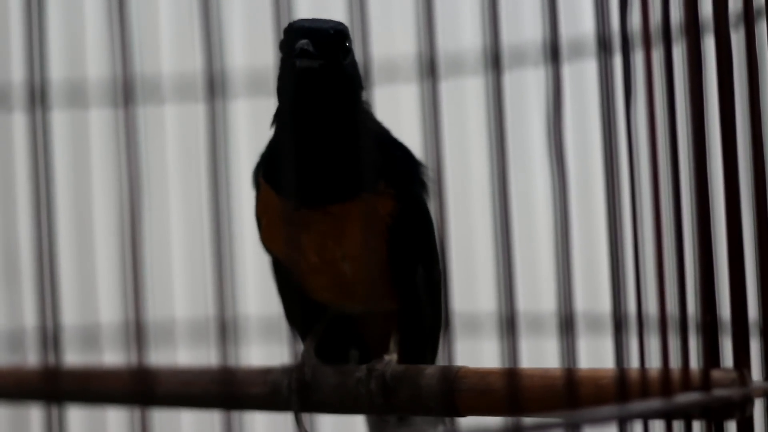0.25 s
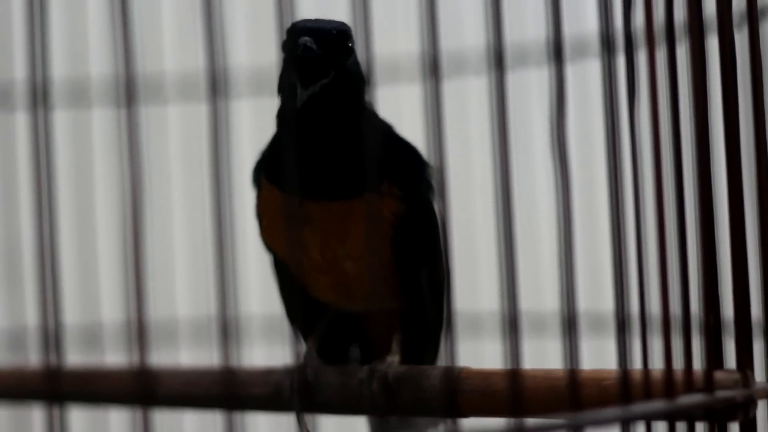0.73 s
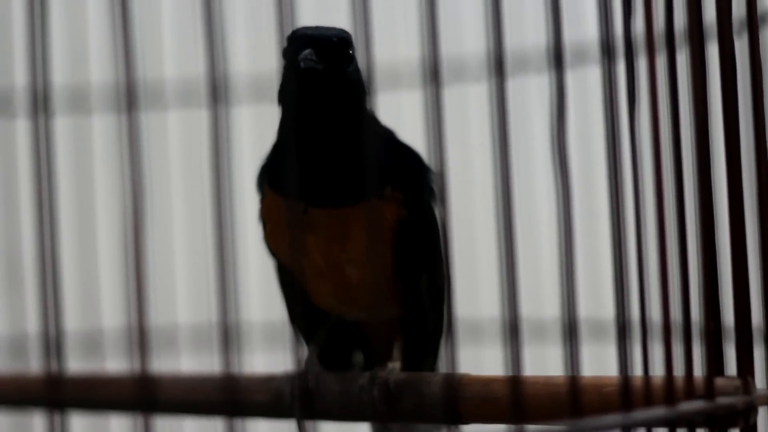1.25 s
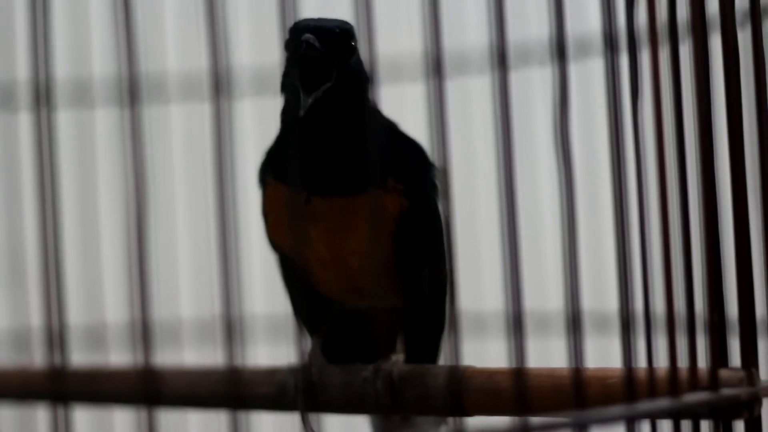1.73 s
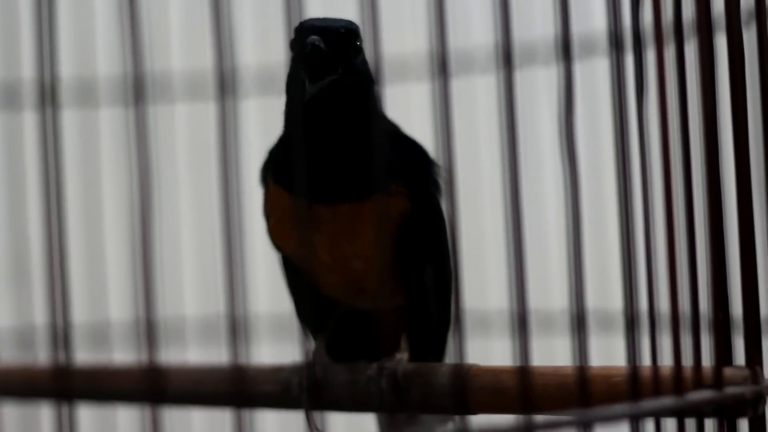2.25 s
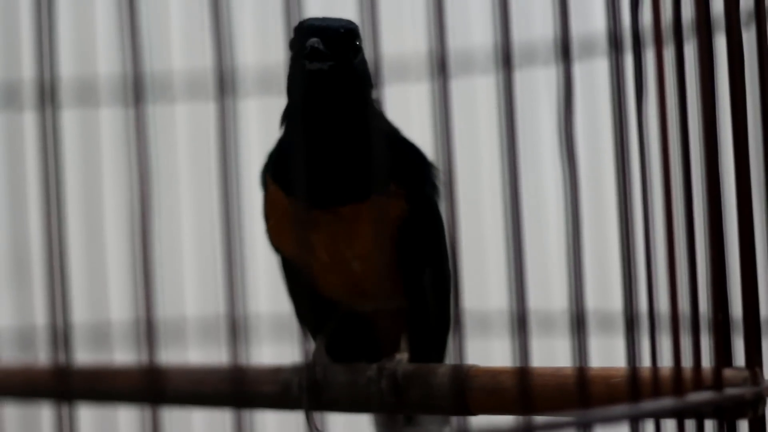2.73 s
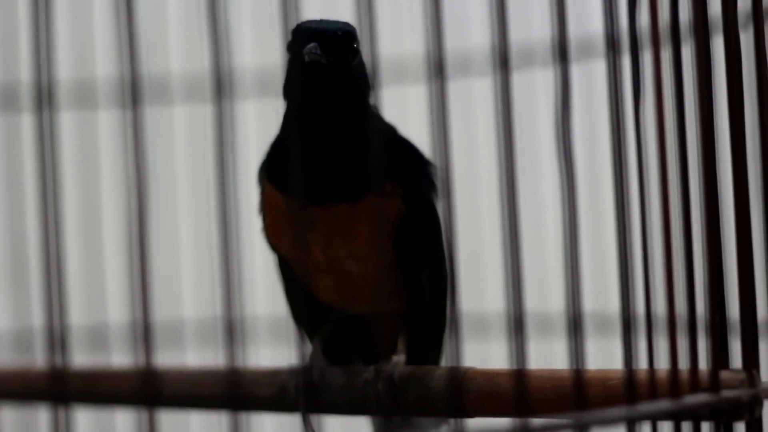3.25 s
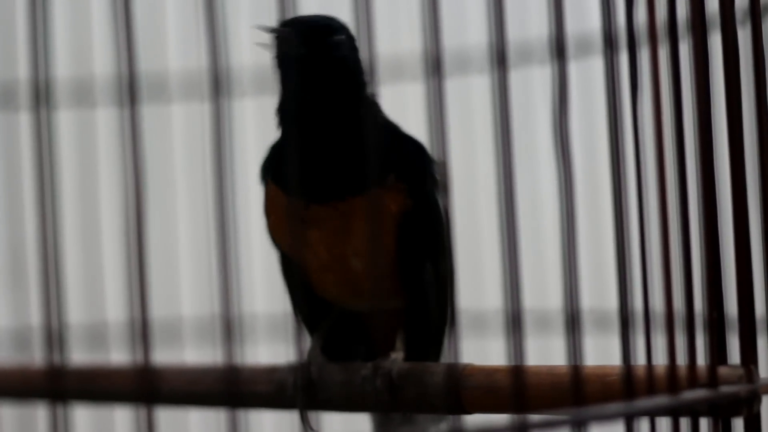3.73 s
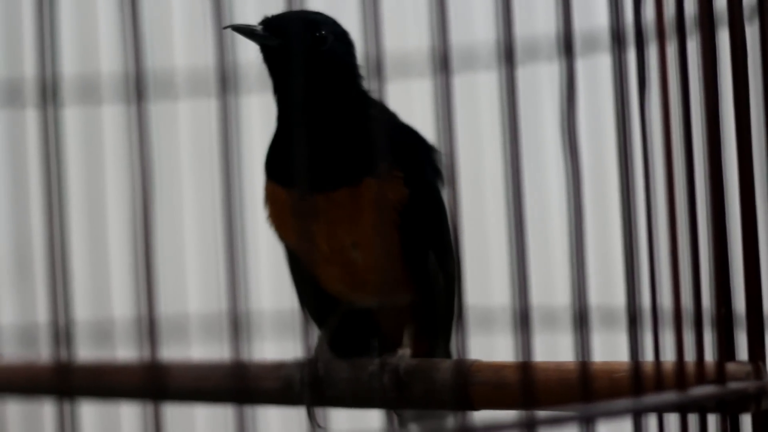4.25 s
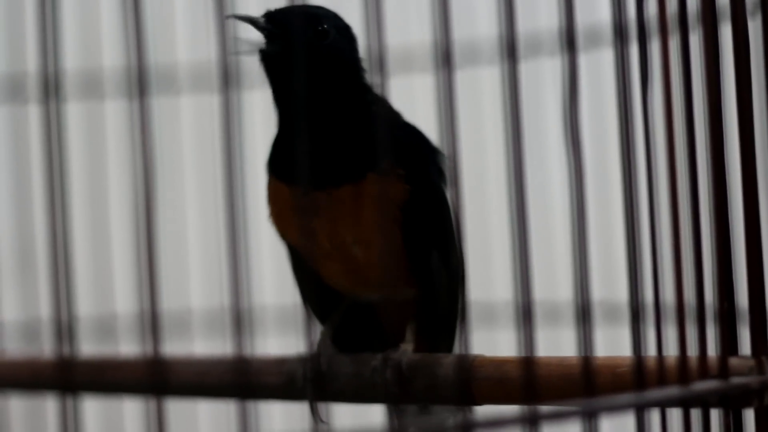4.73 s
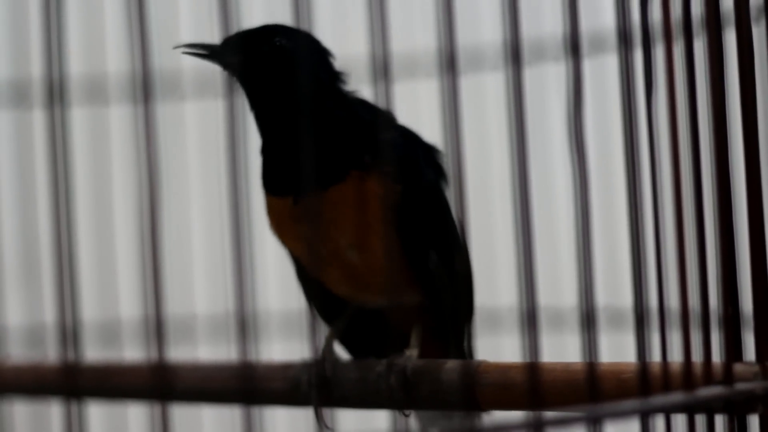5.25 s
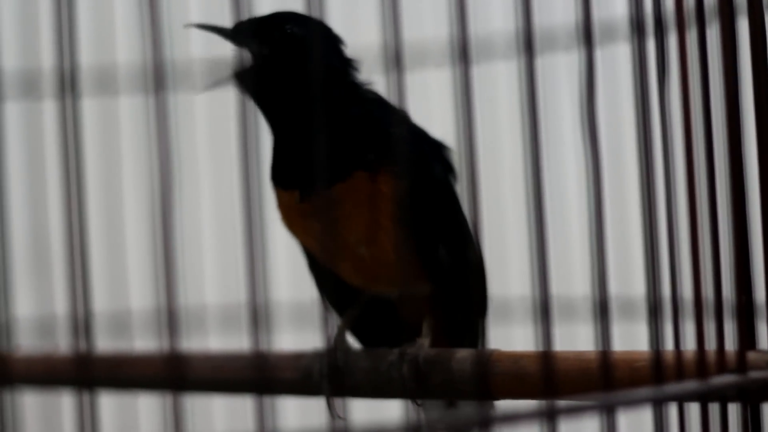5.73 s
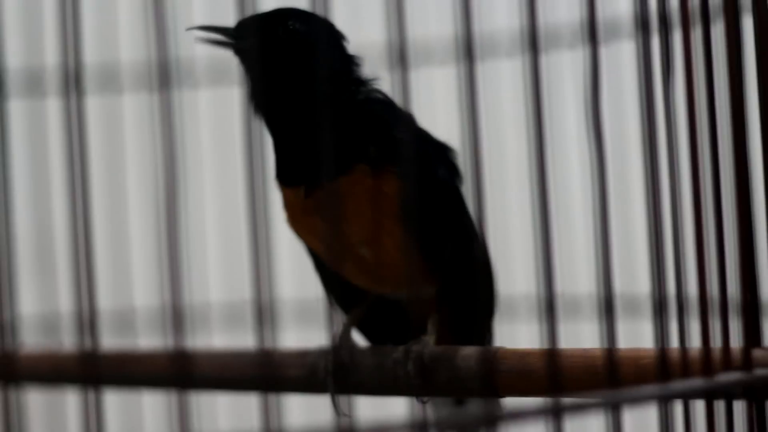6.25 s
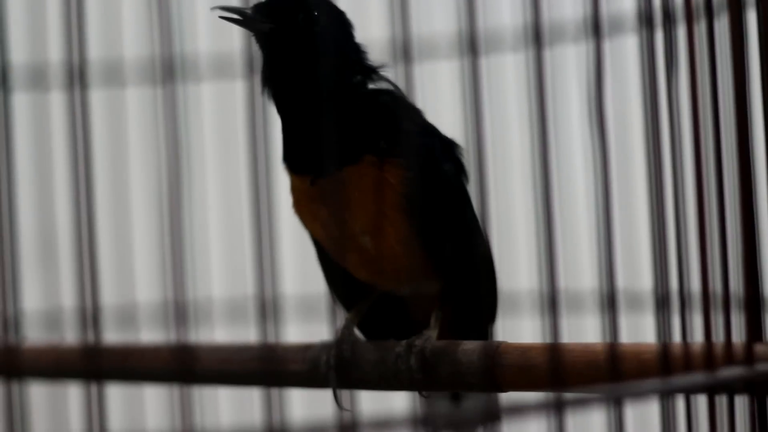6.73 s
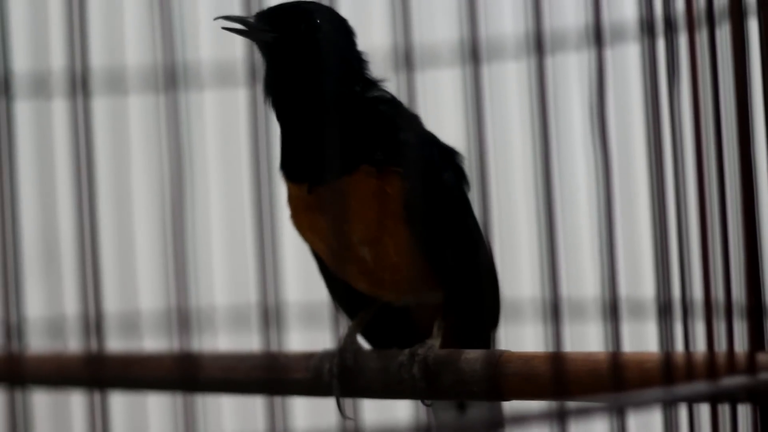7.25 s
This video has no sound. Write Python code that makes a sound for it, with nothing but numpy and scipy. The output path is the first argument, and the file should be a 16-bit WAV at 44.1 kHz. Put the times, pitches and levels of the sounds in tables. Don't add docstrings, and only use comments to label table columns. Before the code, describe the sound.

The yard is already ringing as a nearby caged songbird starts with a short arching warble, then a settling trembling whistle around 0.2 s. Four hoarse, fluttering, rising buzzes follow from 0.8 to 1.1 s. After a pause, a bright whistle sweeps upward at 1.7, a dip flicks up at 2.0, a sharp hook drops at 2.2, and mellow rises and a scoop run from 2.4 to 3.1. Quick stutters, kicks and a trill come at 3.6-3.9. Distant raspy chirps cluster near 4.3-4.6. A pip, chip and warbled hold follow at 4.7-5.0, a piercing climb at 5.4, another dip at 5.6, descending steps at 5.9, and quick falls at 6.2-6.5. Low droops, lifts and long warbles lead to a late fall and final rising note at 7.4. Echoes linger over faint rumble; background swells in pauses.

```python
import sys
import numpy as np
from scipy import signal
from scipy.fft import rfft, irfft
from scipy.io import wavfile
from scipy.ndimage import uniform_filter1d, map_coordinates

SR = 44100
rng = np.random.default_rng(int(sys.argv[2]) if len(sys.argv) > 2 else 0)


def voltage_ratio(level):
    return 10 ** (np.asarray(level, float) / 20)


def wav_record(signal):
    frames = np.transpose(np.atleast_2d(signal))
    bounded = np.clip(frames, -1, 1)
    quanta = np.round(bounded * 32767).astype(np.int16)
    wavfile.write(sys.argv[1], SR, quanta)


N = 330750
LEAD = SR // 2
LONG = N + LEAD
CLOCK = (np.arange(LONG) - LEAD) / SR


def at_hz(points, hz):
    points_hz, points_db = np.transpose(points)
    return np.interp(np.log(hz), np.log(points_hz), points_db)


def band(x, low_hz, high_hz, order=2):
    sos = signal.butter(order, [low_hz, min(high_hz, .45 * SR)], "band", fs=SR, output="sos")
    return signal.sosfilt(sos, x)


def wobble(count, hz):
    low_pass = signal.butter(2, hz, fs=SR, output="sos")
    slow = signal.sosfilt(low_pass, rng.standard_normal(count + 2000))[2000:]
    return slow / slow.std()


def span(start_s, length_s):
    first = LEAD + round(start_s * SR)
    part = slice(first, min(first + round(length_s * SR), LONG))
    return part, CLOCK[part]


def edges(t, rise_s, fall_s):
    nearest_end = np.minimum((t - t[0]) / rise_s, (t[-1] - t) / fall_s)
    return np.sin(np.pi / 2 * np.clip(nearest_end, 0, 1)) ** 2


# (frequency_hz, level_db per Hz)
AMBIENCE = [(25, -19), (45, 0), (100, -7.5), (140, -1), (190, -10), (330, -8), (600, -5.5), (1200, -8),
            (2500, -9), (4500, -14.5), (8500, -18.5), (11300, -26.5), (15500, -50.5)]
# (time_s, level_db)
TRAFFIC = [
    (0, -1),
    (1.3, -9),
    (2.3, -6),
    (3.6, -0.5),
    (5.4, 0),
    (6.5, 1),
    (7.5, 0.5),
]


def ambience():
    hz = np.maximum(np.fft.rfftfreq(LONG, 1 / SR), 1)
    shape = voltage_ratio(at_hz(AMBIENCE, hz))
    noise = irfft(rfft(rng.standard_normal(LONG)) * shape, LONG)
    swell_db = np.interp(CLOCK, *np.transpose(TRAFFIC)) + 0.6 * wobble(LONG, 1.2)
    return noise * voltage_ratio(swell_db) / np.sqrt(np.mean(shape ** 2 * (hz < 700)))


# (time_s, pitch_hz, level_db)
ARCH = [(0, 1250, -22), (.03, 1345, -20.5), (.04, 1473, -17.5), (.085, 1508, -22), (.103, 1504, -15.5),
        (.138, 1320, -28), (.148, 1340, -35)]
SETTLE = [(0.21, 2197, -20.5), (0.222, 2205, -10.5), (0.234, 2086, -24), (0.24, 2050, -10.5),
          (0.272, 1984, -7.5), (0.302, 1952, -15.5), (0.326, 1911, -7.5), (0.356, 1924, -28)]
SWEEP = [(1.681, 3780, -33.5), (1.689, 3536, -18), (1.711, 3696, -8.5), (1.723, 3760, -15.5),
         (1.739, 4030, -5), (1.777, 4470, -14), (1.791, 4680, -3.5), (1.815, 4777, -11),
         (1.85, 4657, -14.5)]
HOOK = [(2.222, 3555, -23.5), (2.234, 3545, -15), (2.254, 3602, -9.5), (2.273, 3560, -15.5),
        (2.287, 2678, -23.5), (2.298, 2262, -20), (2.312, 2466, -14.5), (2.319, 2725, -5),
        (2.34, 2796, -19)]
SCOOP = [(2.71, 1866, -19), (2.74, 1985, -9.5), (2.791, 2102, -15.5), (2.841, 1970, -10),
         (2.881, 1600, -28.5), (2.927, 1416, -27), (2.991, 1872, -21), (3.03, 2032, -18), (3.07, 1959, -17)]
PIP = [(4.677, 2890, -34), (4.684, 1760, -24.5), (4.691, 1813, -13.5), (4.7, 1934, -7.5), (4.714, 1892, -6),
       (4.727, 2064, -14), (4.733, 2135, -15.5)]
CLIMB = [(5.38, 3910, -33), (5.388, 3588, -10), (5.426, 3850, -6), (5.452, 4327, -7), (5.466, 5250, -11),
         (5.478, 5550, -20), (5.486, 4890, -2.5), (5.504, 5095, -20), (5.543, 4760, -18.5)]
STEPS = [(5.919, 2404, -18.5), (5.958, 2433, -11), (6.0, 2397, -10.5), (6.03, 2227, -11.5),
         (6.049, 2035, -17), (6.107, 2075, -9), (6.124, 1885, -28.5), (6.149, 1288, -27.5)]
LIFT = [(6.67, 992, -43), (6.7, 1235, -19), (6.717, 1464, -16), (6.732, 1370, -13), (6.764, 1385, -14),
        (6.778, 1340, -19), (6.79, 1385, -10.5), (6.806, 1380, -11.5)]
CLOSE = [(7.407, 1335, -24.5), (7.419, 1700, -10), (7.44, 1988, -10), (7.459, 2068, -11)]
STUTTER = [(3.625, 1740, -29.5), (3.632, 1765, -17), (3.641, 1905, -9), (3.649, 1850, -19),
           (3.657, 1785, -9), (3.667, 1730, -17)]
# (octave_db over the windpipe rule, upper_partials_db)
FIGURE_OVERTONES = [(-4, -30.5), (-0.5, -35), (6, -25.5), (2, -31), (-3.5, -30.5), (-2.5, -30), (1, -35),
                    (-8, -30), (-2.5, -37.5), (-4, -27), (-5.5, -39.5)]
# (time_s, pitch_hz, level_db)
ANSWERS = [
    [(2.703, 3100, -46), (2.72, 3800, -37), (2.735, 3900, -34), (2.748, 3850, -39)],
    [(2.722, 5250, -48), (2.74, 5250, -45), (2.752, 4600, -43), (2.766, 4150, -46)],
]
# (time_s, pitch_hz, level_db)
RUN_UP = [(.777, 1900, -40), (.783, 2500, -33), (.788, 3350, -25)]


def long_figures():
    figures = (ARCH, SETTLE, SWEEP, HOOK, SCOOP, PIP, CLIMB, STEPS, LIFT, CLOSE, STUTTER)
    notes = [(figure, *overtones) for figure, overtones in zip(figures, FIGURE_OVERTONES)]
    return notes + [(thin, -20, -60) for thin in [*ANSWERS, RUN_UP]]


# (start_s, length_s, first_pitch_hz, second_pitch_hz, level_db)
FALL = [(0, 0.067, -12), (.25, .08, -2), (.65, .65, -5), (1, 0.98, -20)]
FALLS = [
    (6.24, 0.047, 1924, 1098, -15),
    (6.308, 0.037, 2266, 1199, -10.5),
    (6.368, 0.03, 2419, 1280, -6.5),
    (6.433, 0.021, 2574, 1395, -8.5),
    (7.239, 0.058, 1295, 799, -20),
]
DROOP = [(0, .06, -19), (.25, 0, -2), (.45, .22, 0), (.75, .75, -21.5), (1, 0.854, -16.5)]
DROOPS = [
    (6.614, 0.055, 1799, 1153, -10),
    (7.332, 0.057, 1594, 794, -7),
]
RISE = [(0, 0.017, -8), (.4, .5, -3), (.7, .92, 2.5), (.88, 0.94, 1.5), (1, 0.74, -3)]
RISES = [
    (2.432, 0.097, 1866, 2011, -12.5),
    (2.55, 0.047, 2180, 2355, -11),
    (6.56, 0.051, 889, 985, -33.5),
]
CHIP = [(0, 0.09, -20), (.45, 1, -0.5), (.75, .7, 3.5), (1, 0.14, -7.5)]
CHIPS = [
    (3.772, 0.007, 1830, 2280, -8.5),
    (4.833, 0.01, 2140, 2383, -8.5),
]
HOLD = [(0, 0.11, -5), (.15, .5, -5), (.5, 0.94, 1), (1, .9, -0.5)]
HOLDS = [
    (-.36, .12, 2870, 2640, -14.5),
    (-.2, 0.18, 2133, 1988, -18.5),
    (6.145, .035, 2070, 2085, -16.5),
    (4.851, 0.143, 1654, 1735, -17.5),
    (6.924, 0.21, 1557, 1582, -13),
]
DIP = [(0, .25, -22), (.22, .36, -8), (.36, .52, -7.5), (.65, .47, -11.5), (.85, .36, -6),
       (1, 0.076, -10.5)]
DIPS = [
    (1.957, .105, 2098, 3081, -5),
    (5.635, .127, 2122, 3116, -4.5),
]
KICK = [(0, 0, -12.5), (.4, .55, -11), (.65, 0.71, -3.5), (.82, 0.96, -0.5), (.93, .45, -1.5), (1, .4, 2)]
KICKS = [
    (3.733, .038, 1544, 1905, -10),
    (4.79, .04, 1650, 2040, -10),
]
TRILL = [(0, .3, -9), (.15, .6, -3), (.35, 1.1, 0), (.6, .9, -2), (.85, .3, -2.5), (1, .3, -8)]
TRILLS = [
    (3.813, .1, 1652, 1760, -9.5),
]
# (time_s after the dip, share of the way, level_db)
FLICK = [(0.012, 0.134, -13.5), (0.021, 0.617, 0), (0.028, 0.821, -6), (.038, .96, -6), (.048, .97, -9),
         (.051, 1.33, -9), (.057, 1.28, -13)]
# (octave_db over the windpipe rule, upper_partials_db)
OVERTONES = [
    (-3, -26.5),
    (-1, -36.5),
    (-3.5, -25),
    (-9, -49),
    (1.5, -32),
    (-3, -35),
    (4, -28),
    (1.5, -32),
]


def short_notes():
    kinds = [(FALL, FALLS), (DROOP, DROOPS), (RISE, RISES), (CHIP, CHIPS),
             (HOLD, HOLDS), (DIP, DIPS), (KICK, KICKS), (TRILL, TRILLS)]
    notes = []
    for (shape, rows), overtones in zip(kinds, OVERTONES):
        for start_s, length_s, first_hz, second_hz, level_db in rows:
            points = [(share * length_s, way, under_db) for share, way, under_db in shape]
            if shape is DIP:
                points += [(length_s + after_s, way, under_db) for after_s, way, under_db in FLICK]
            path = [(start_s + t, first_hz + way * (second_hz - first_hz), level_db + under_db)
                    for t, way, under_db in points]
            notes.append((path, *overtones))
    return notes


# (first_crest_s, end_s, start_rate_hz, end_rate_hz, depth as a share of pitch)
WARBLES = [
    (-.19, -0.029, 44, 45.7, 0.061),
    (0.044, 0.1, 43.4, 43.5, 0.06),
    (0.25, 0.338, 53.6, 48.7, 0.031),
    (3.824, 3.92, 47.5, 47.5, 0.095),
    (4.902, 4.99, 41, 41, 0.105),
    (6.723, 6.828, 25, 24.4, 0.039),
    (6.929, 7.018, 28.1, 31.3, 0.065),
    (7.026, 7.14, 42.35, 39.9, 0.049),
]


def warble():
    factor = np.ones(LONG)
    for crest_s, end_s, from_hz, to_hz, depth in WARBLES:
        start_s = crest_s - 1 / (4 * from_hz)
        part, t = span(start_s, end_s - start_s)
        turns = np.cumsum(np.linspace(from_hz, to_hz, len(t))) / SR
        swell = np.clip(.5 + turns / 2.5, 0, 1)
        factor[part] += depth * swell * np.sin(2 * np.pi * turns) * edges(t, 0.0011, 0.0052)
    return factor


# (frequency_hz, level_db)
TRACT = [(2500, 2.5), (5000, -4), (6500, -12.5), (8000, -3.5), (9500, 8.5), (11500, -5), (14000, -8),
         (17000, -62)]
# (pitch_hz, level_db against the fundamental)
OCTAVE = [(900, -5), (1200, -25.5), (1750, -25.5), (2050, -27), (2600, -21), (3600, -25), (5000, -33)]
# (time_s, octave_gain_db, upper_partials_gain_db)
BEAK = [(0, 3, 0.5), (.3, -12.5, -4.5), (1.75, 5, 7.5), (2.0, -11, -15), (2.28, -1, 3), (2.45, -8, -14),
        (3.1, -6, -2.5), (3.7, 12, 7), (3.9, -19, -4.5), (4.7, 4.5, -9.5), (4.81, 11.5, -1.5),
        (4.88, -3.5, 3.5), (5.45, 5.5, -6), (5.95, -7.5, -15.5), (6.3, -6, -3.5), (6.75, -4, 4),
        (7.05, -12, -1.5), (7.45, -1, -6)]
EFFORT = 0.17
THIRD_DB = -5


def whistles():
    out = np.zeros(LONG)
    tremble = warble() * (1 + 0.0058 * wobble(LONG, 130))
    patchy = voltage_ratio(4.5 * wobble(LONG + SR, 45))
    beak_s, throat_db, beak_db = np.transpose(BEAK)
    throat = voltage_ratio(np.interp(CLOCK, beak_s, throat_db))
    beak = voltage_ratio(np.interp(CLOCK, beak_s, beak_db))
    for path, octave_db, upper_db in long_figures() + short_notes():
        path_s, path_hz, path_db = np.transpose(path)
        part, t = span(path_s[0] - .003, path_s[-1] - path_s[0] + .007)
        glide = uniform_filter1d(np.interp(t, path_s, path_hz), size=260)
        pitch = glide * tremble[part]
        phase = 2 * np.pi * np.cumsum(pitch) / SR
        level_db = np.interp(t, path_s, path_db)
        effort = voltage_ratio(EFFORT * (level_db - path_db.max()))
        octave = effort * voltage_ratio(octave_db + at_hz(OCTAVE, pitch)) * throat[part] * patchy[part]
        tone = np.sin(phase) + octave * np.sin(2 * phase)
        for k in range(3, 13):
            partial_db = upper_db + THIRD_DB * (k == 3) - 2.5 - 9.2 * max(k - 6, 0)
            level = voltage_ratio(partial_db + at_hz(TRACT, k * pitch)) * (k * pitch < .45 * SR)
            own_patches = patchy[k * SR // 13:][part]
            tone += level * beak[part] * own_patches * np.sin(k * phase)
        out[part] += np.sqrt(2) * voltage_ratio(level_db) * edges(t, .006, .007) * tone
    return out


# (start_s, peak_level_db, low_voice_hz, high_voice_hz, rasp_db)
CHIRPS = [(0.2901, -23.5, 2766, 4690, 0.5), (0.372, -27.5, 3140, 5500, 7.5),
          (0.4944, -32, 3710, 5100, -4.5), (0.54, -36, 3000, 4800, 1.5), (0.748, -21, 4300, 5300, -1.5),
          (1.1874, -31, 3670, 3890, 1.5), (2.76, -21, 4030, 4300, -21.5), (3.0753, -22, 3660, 4410, 0.5),
          (3.164, -19.5, 3980, 5930, -6), (3.5723, -17.5, 2866, 3930, -5), (3.69, -17, 3750, 4480, -8.5),
          (4.304, -13.5, 4700, 5700, 1.5), (4.33, -15, 3700, 4700, -2), (4.368, -25, 4600, 7500, 2.5),
          (4.4022, -16, 3926, 4900, -1.5), (4.456, -23, 3900, 4800, -1.5), (4.507, -30, 4000, 7200, 1.5),
          (4.5578, -32, 4010, 9000, 4.5), (6.166, -21, 4650, 5500, -1.5), (6.2529, -17, 3800, 5500, -4),
          (6.3395, -12, 4100, 5400, -13), (6.545, -20.5, 4140, 5370, 1), (6.6244, -23.5, 3360, 5500, 4.5),
          (6.734, -16.5, 4000, 5750, -3), (6.8221, -16, 3920, 5580, -6.5)]


def far_chirps():
    out, shake = np.zeros(LONG), wobble(LONG + SR, 370)
    grit = voltage_ratio(2.5 * shake[::-1][:LONG] - 1)
    white = grit * rng.standard_normal(LONG)
    rasp, top = band(white, 2500, 6210), band(white, 6570, 7300)
    fizz = band(white[::-1], 7500, 10800)
    for start_s, peak_db, low_hz, high_hz, rasp_db in CHIRPS:
        part, t = span(start_s - .009, 0.051)
        since = t - t[0]
        fall = 1.08 - 4.5 * since
        low_pitch = low_hz * fall * (1 + 0.027 * shake[part])
        high_pitch = high_hz * fall * (1 + 0.037 * shake[SR:][part])
        low = np.sin(2 * np.pi * np.cumsum(low_pitch) / SR)
        high = np.sin(2 * np.pi * np.cumsum(high_pitch) / SR)
        tone = low + voltage_ratio(-1.5) * high + voltage_ratio(-2.5) * top[part]
        throat = sum(band(white[part], .88 * hz, 1.08 * hz) for hz in (low_hz, high_hz))
        late = np.clip(since / .03, 0, 1)
        harsh = voltage_ratio(1.5) * rasp[part] + voltage_ratio(10.5) * throat + voltage_ratio(-1.5) * late * fizz[part]
        tone += voltage_ratio(rasp_db) * harsh
        dying = np.exp(-since / 0.021)
        out[part] += voltage_ratio(peak_db - 11.5) * edges(t, .013, 0.0094) * dying * tone
    return out


# (start_s, length_s, first_pitch_hz, last_pitch_hz, level_db)
BUZZES = [
    (0.784, 0.054, 1660, 2380, -11.5),
    (0.859, 0.06, 1960, 2340, -14),
    (0.935, 0.056, 1930, 2270, -15),
    (1.016, 0.053, 2000, 2380, -15),
]
# (first_crest_s, depth as a share of pitch, bend of the rise)
FLUTTERS = [
    (.793, .095, .75),
    (.866, .07, .9),
    (.939, .075, .8),
    (1.02, .08, .8),
]
# (multiple of the pitch, level_db)
BUZZ_PARTIALS = [(1, -2.5), (2, -0.5), (3, -21), (4, -17), (5, -24.5), (6, -34.5)]
FLUTTER_HZ, BREATH_DB = 95.2, -12


def buzzes():
    out, shake = np.zeros(LONG), wobble(LONG, 400)
    uneven = voltage_ratio(2.5 * wobble(LONG, 120))
    white = rng.standard_normal(LONG)
    breath, croak = band(white, 5700, 9200), band(white, 2280, 2600)
    for (start_s, length_s, from_hz, to_hz, db), (crest_s, depth, bend) in zip(BUZZES, FLUTTERS):
        part, t = span(start_s, length_s)
        done = (t - t[0]) / length_s
        flutter = 2 * np.pi * FLUTTER_HZ * (t - crest_s)
        arch = np.cos(flutter) - .3 * np.cos(2 * flutter + .6)
        rise = from_hz + (to_hz - from_hz) * done ** bend
        pitch = rise * (1 + depth * arch + .006 * shake[part])
        phase = 2 * np.pi * np.cumsum(pitch) / SR
        swell = np.sin(np.pi * done ** 1.05)
        growth = {1: done ** 3, 2: 1}
        tone = sum(voltage_ratio(level_db) * growth.get(k, swell) * np.sin(k * phase) for k, level_db in BUZZ_PARTIALS)
        pulsing = 1 + .42 * np.cos(2 * flutter + 3.0) + .3 * np.cos(flutter + .1)
        air = breath[part] + voltage_ratio(11.0) * done * pulsing * croak[part]
        voice = pulsing * uneven[part] * tone + voltage_ratio(BREATH_DB) * swell * air
        out[part] += np.sqrt(2) * voltage_ratio(db) * edges(t, 0.008, 0.017) * voice
    return out


# (middle_s, level_db)
PUFFS = [
    (1.683, -32.5),
    (3.601, -46),
    (4.678, -31),
    (4.827, -30),
    (5.38, -39.5),
    (5.776, -34),
]
PUFF_S = 0.014


def puffs():
    out, air = np.zeros(LONG), band(rng.standard_normal(LONG), 1200, 9000)
    for middle_s, db in PUFFS:
        part, t = span(middle_s - PUFF_S / 2, PUFF_S)
        out[part] += voltage_ratio(db) * edges(t, PUFF_S / 2, PUFF_S / 2) * air[part]
    return out


# (frequency_hz, t60_s to fade by 60 dB, level_db)
YARD = [(726, 0.34, -2), (1400, 0.99, -5.5), (2040, 1.4, -10.5), (3560, 1.04, -10.5), (5500, 1.11, -9.5),
        (8650, 0.51, -9), (13260, 0.33, -9)]
# (delay_s, level_db)
ECHOES = [(.0028, -18.5), (.0055, -7), (.011, -16), (.016, -14.5), (.0195, -14.5), (.025, -14), (.041, -27),
          (.065, -18.5), (.07, -22.5)]


def yard(x):
    t, tail = np.arange(3 * SR // 2) / SR, 0
    hz = np.array(YARD)[:, 0]
    cuts = np.sqrt(np.r_[hz[0] / 4, hz] * np.r_[hz, hz[-1] * 2])
    for low_hz, high_hz, (_, t60_s, db) in zip(cuts, cuts[1:], YARD):
        dying = voltage_ratio(-60 * t / t60_s)
        dense = band(rng.standard_normal(len(t)), low_hz, high_hz)
        tail = tail + voltage_ratio(db) * dense * dying / np.sqrt(np.sum(dying ** 2))
    tail = tail * np.clip((t - .004) / 0.0062, 0, 1)
    slaps = np.zeros(len(t))
    for delay_s, db in ECHOES:
        slaps[round(delay_s * SR)] = voltage_ratio(db)
    dull = signal.butter(1, 5000, fs=SR)
    return signal.fftconvolve(x, tail + signal.lfilter(*dull, slaps))[:LONG]


# (time_s, depth_db)
DUCKS = [(-.15, 12), (0.326, 5.5), (0.797, 5), (1.736, 11), (2.044, 4.5), (2.331, 6.5), (2.746, 7.5),
         (3.652, 5.5), (3.848, 8.5), (4.702, 7), (5.413, 19), (5.776, 6), (5.981, 3.5), (6.344, 7.5),
         (6.72, 4), (7.0, 4.5), (7.401, 6.5)]
REST_DB, DUCK_S, RECOVER_S = 13, 0.059, 0.59


def recorder_gain():
    db = REST_DB
    for duck_s, depth_db in DUCKS:
        since = np.maximum(CLOCK - duck_s, 0)
        db = db - depth_db * (1 - np.exp(-since / DUCK_S)) * np.exp(-since / RECOVER_S) * 1.5
    return voltage_ratio(db)


def scene():
    gain = recorder_gain()
    near = (whistles() + buzzes()) / gain
    far = far_chirps() / gain
    sway = np.arange(LONG) + SR * .00013 * wobble(LONG, 12)
    echoes = yard(map_coordinates(near + voltage_ratio(10.5) * far, [sway], order=3))
    mix = near + far + echoes + puffs() / gain + voltage_ratio(-53.0) * ambience()
    return mix[None, LEAD:]


def roll_off(x):
    return signal.sosfilt(signal.butter(12, 15700, fs=SR, output="sos"), x)


def record(dry):
    dull_top = signal.butter(8, 14300, fs=SR, output="sos")
    heard = signal.sosfilt(dull_top, dry * recorder_gain()[LEAD:])
    limited = .97 * heard / (1 + heard ** 8) ** (1 / 8)
    no_bass = signal.butter(2, 28, "high", fs=SR, output="sos")
    return roll_off(signal.sosfilt(no_bass, limited))


dry = scene()
out = record(dry)
wav_record(out)
```